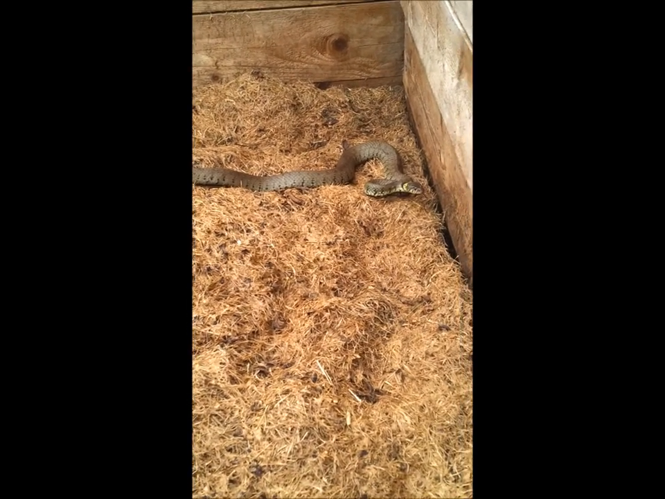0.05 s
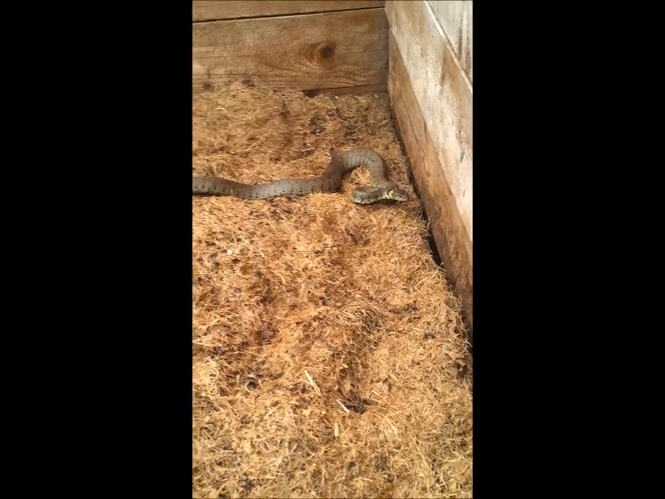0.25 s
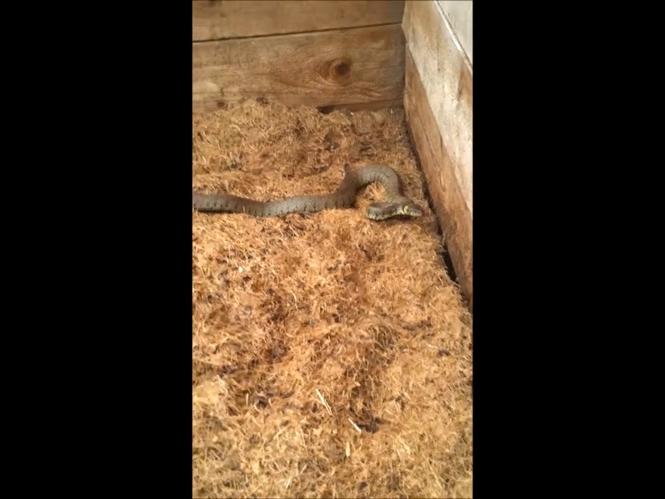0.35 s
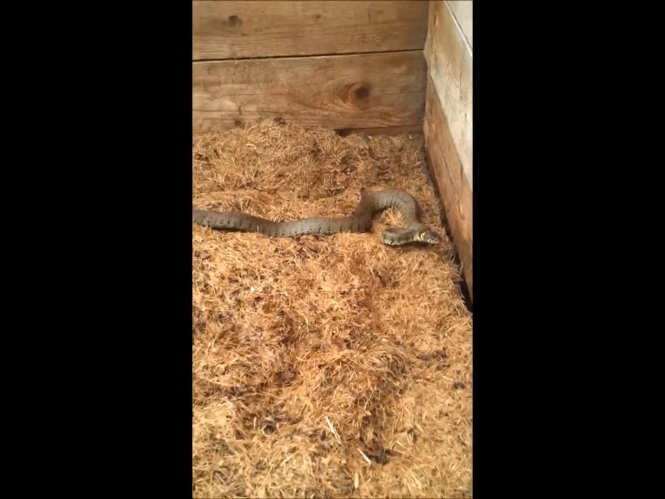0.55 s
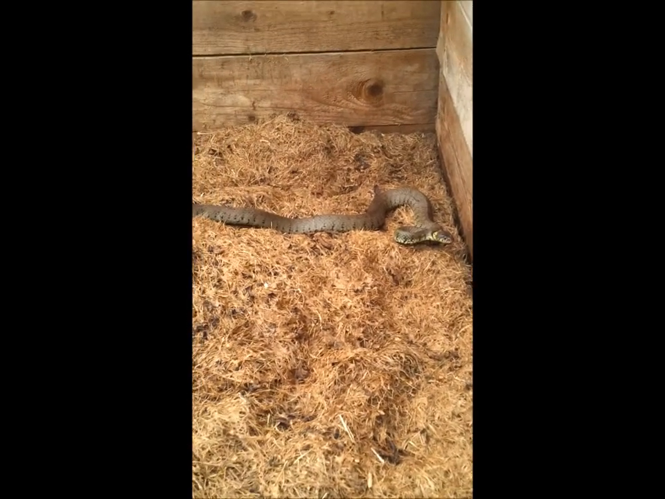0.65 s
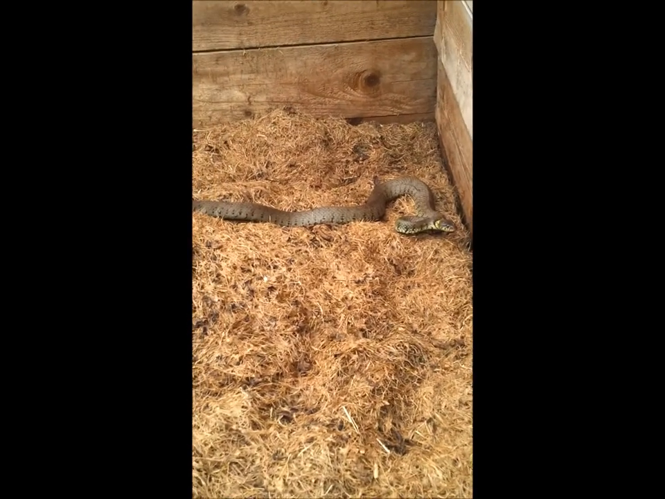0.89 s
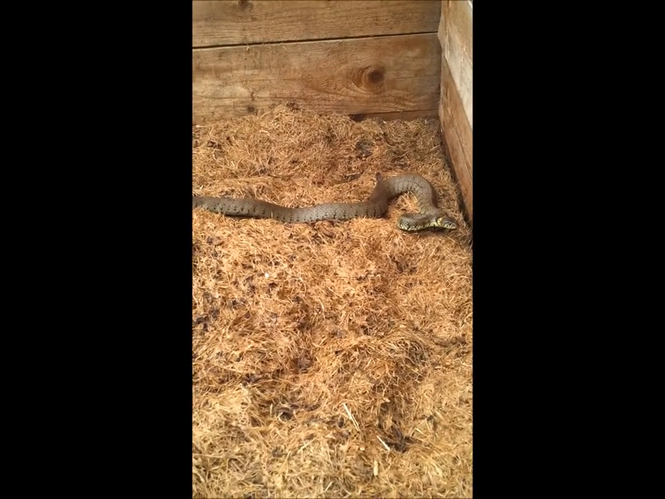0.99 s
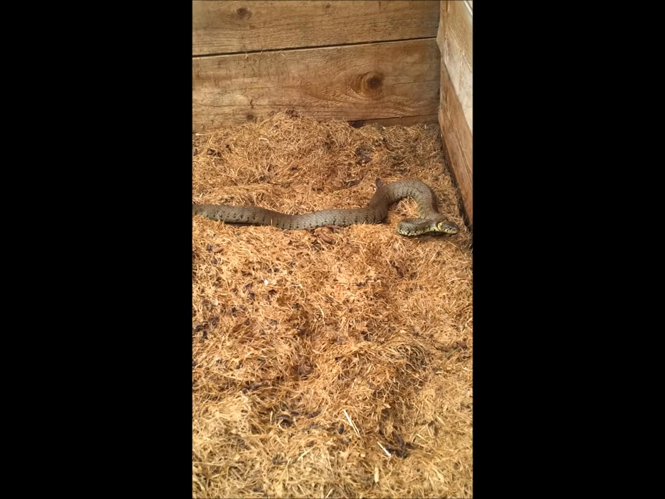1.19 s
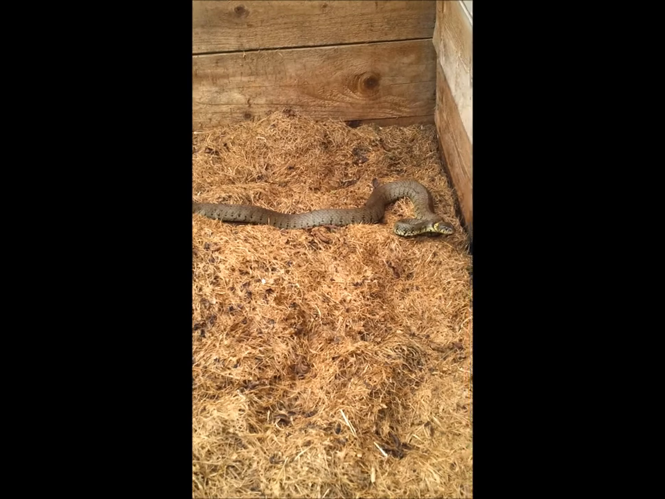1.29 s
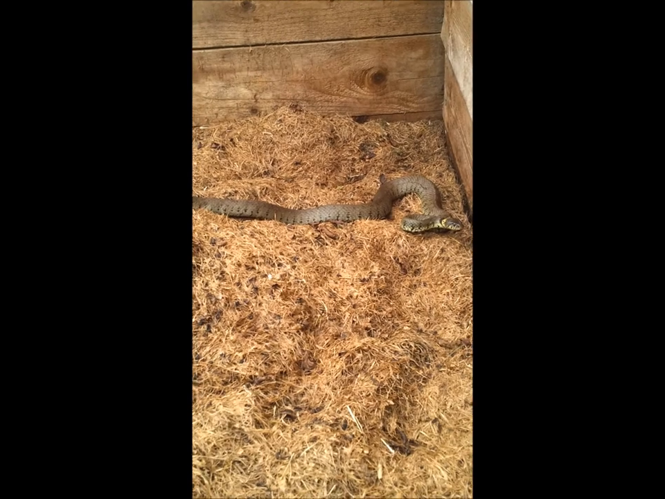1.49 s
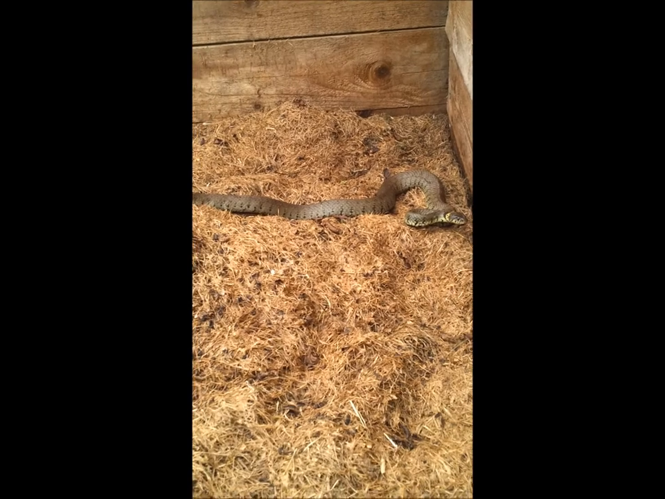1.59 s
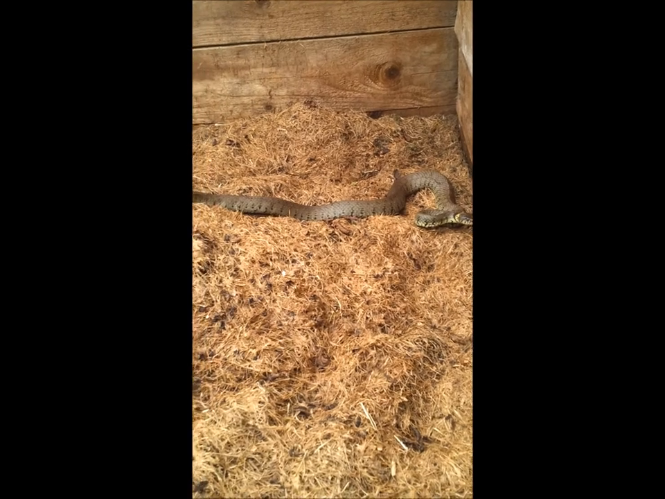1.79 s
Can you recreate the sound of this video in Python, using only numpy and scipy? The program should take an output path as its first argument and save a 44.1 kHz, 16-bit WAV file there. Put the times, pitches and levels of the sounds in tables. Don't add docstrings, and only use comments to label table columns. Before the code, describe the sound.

Brief airy snake hiss, close and dry, preceded by a sharp handling swipe with ticks and a swish; afterwards quiet bumps, a faint distant bird whistle and light rustling of bedding over a soft low background.

```python
import sys
import numpy as np
from scipy import signal
from scipy.fft import rfft, irfft
from scipy.io import wavfile
from scipy.ndimage import uniform_filter1d

SR = 44100
rng = np.random.default_rng(int(sys.argv[2]) if len(sys.argv) > 2 else 0)


def put_to_file(sound):
    columns = np.atleast_2d(sound).T
    safe = np.clip(columns, -1, 1)
    whole_steps = np.round(safe * 32767)
    wavfile.write(sys.argv[1], SR, whole_steps.astype(np.int16))


def volts_from_db(level):
    exponent = np.asarray(level, float) / 20
    return 10 ** exponent


N = 81585
TIME = np.arange(N) / SR


def evened(x):
    return x / np.sqrt(np.mean(x ** 2) + 1e-20)


def curve(rows, column=1, before=None):
    rows = np.asarray(rows, float)
    return np.interp(TIME, rows[:, 0], rows[:, column], left=before, right=before)


def colour(x, points):
    f, db = np.transpose(points)
    hz = np.fft.rfftfreq(N, 1 / SR) + 1
    octaves_outside = np.maximum(np.log2(f[0] / hz), 0) + np.maximum(np.log2(hz / f[-1]), 0)
    gain_db = np.interp(np.log(hz), np.log(f), db) - 14 * octaves_outside
    return evened(irfft(rfft(x) * volts_from_db(gain_db), N))


def band(x, low_hz, high_hz):
    return signal.sosfilt(signal.butter(3, [low_hz, high_hz], "band", fs=SR, output="sos"), x)


def resonate(x, hz, width_hz):
    turn = np.exp(2j * np.pi * np.cumsum(hz * np.ones(len(x))) / SR)
    r = np.exp(-np.pi * width_hz / SR)
    return 2 * (turn * signal.lfilter([1 - r], [1, -r], x / turn)).real


def grains(per_s, spread_db, smooth):
    size_db = spread_db * np.minimum(rng.exponential(1, N), 4)
    clicks = volts_from_db(size_db) * rng.choice([-1., 1.], N) * (rng.random(N) < per_s / SR)
    return evened(clicks) + smooth * rng.standard_normal(N)


def flutter(span_s, depth_db):
    width = max(round(span_s * SR), 2)
    wobble = uniform_filter1d(uniform_filter1d(rng.standard_normal(N), width), width)
    return volts_from_db(depth_db * evened(wobble))


# frequency in Hz, level in dB per Hz.
FLOOR_TONE = [(88, -13), (150, -3), (416, -16), (490, -25), (567, -10), (1090, -16), (2770, -20.5),
              (3510, -22), (11700, -26), (15200, -51), (22000, -120)]


def background():
    return colour(rng.standard_normal(N) * flutter(0.21, 1.0), FLOOR_TONE) * volts_from_db(-52.5)


def hum():
    return volts_from_db(-58) * evened(resonate(rng.standard_normal(N), 156.8, 2.8))


# time in seconds, gust level in dB.
GUST = [(0, -47), (.09, -40), (.16, -45.5), (.23, -42.5), (.3, -31), (.375, -44), (.42, -41), (.47, -52),
        (.5, -43.5), (.53, -46.5), (.66, -47.5), (.85, -47), (.95, -46), (.99, -43.5), (1.2, -49),
        (1.33, -41), (1.39, -50), (1.85, -47.5)]
# frequency in Hz, level in dB per Hz.
GUST_TONE = [(12, -77), (20, 0), (113, -2.5), (236, -20.5), (285, -11.5), (357, -22), (400, -22),
             (520, -18), (880, -120)]


def air():
    eddies = rng.standard_normal(N) * flutter(0.0087, 1.6)
    return colour(eddies, GUST_TONE) * volts_from_db(curve(GUST) - 1.0)


# start in
# seconds, peak level in dB, lowest frequency in Hz, highest frequency in Hz, 60 dB decay time in seconds.
TICKS = [(0.088, -32.5, 360, 2540, 0.042), (0.1481, -30, 370, 2820, 0.041), (0.176, -43, 915, 1490, 0.04),
         (0.183, -39.5, 585, 1260, 0.034), (.198, -36.5, 910, 2490, 0.073), (0.225, -41, 890, 2500, 0.078),
         (0.2436, -33.5, 1570, 6400, 0.017), (0.255, -31, 1000, 3300, 0.013), (.267, -33, 700, 2500, .008),
         (0.281, -28, 800, 2480, 0.016), (.298, -29, 500, 2490, .012), (.311, -26, 596, 2160, 0.0088),
         (0.3145, -21.5, 705, 2490, 0.012), (.329, -23, 500, 2520, 0.0071), (.337, -23, 800, 3180, 0.013),
         (0.3693, -10, 1080, 3440, 0.0046), (.3815, -19, 1490, 2300, 0.025),
         (.396, -18.5, 3300, 4600, 0.0068), (.436, -31, 404, 1070, 0.083), (0.57, -36, 810, 1890, 0.02),
         (0.667, -36, 483, 1930, 0.029), (.846, -39, 286, 810, 0.019), (1.1614, -40, 251, 1460, 0.006),
         (1.773, -40, 497, 990, 0.018), (1.791, -36, 650, 1481, 0.016), (1.824, -38, 497, 1200, 0.018),
         (1.843, -41, 795, 1530, 0.036)]


def ticks():
    out, t = np.zeros(N + 4000), np.arange(4000) / SR
    for s, db, low_hz, high_hz, t60 in TICKS:
        crackle = rng.standard_normal(4000) * volts_from_db(-60 * t / max(t60, .004))
        push = (t == 0) * 13.0 + crackle
        push = signal.lfilter([1], [1, -.85], push)
        low_pass = signal.butter(6, high_hz, fs=SR, output="sos")
        tick = signal.sosfilt(low_pass, band(push, low_hz, high_hz))
        out[round(s * SR):][:4000] += volts_from_db(db) * tick / abs(tick).max()
    return out[:N]


# start in seconds, level in dB, pitch in Hz, 60 dB decay time in seconds.
THUMPS = [(0.111, -41.5, 64.3, 0.27), (0.196, -36, 244, 0.027), (0.243, -27.5, 183, 0.039),
          (0.255, -31, 161, 0.05), (0.2762, -18.5, 340, 0.0053), (.2885, -28, 407, 0.015),
          (.3132, -23.5, 580, 0.012), (0.3167, -24, 590, 0.019), (0.329, -33, 294, 0.033),
          (0.354, -25.5, 424, 0.018), (0.3578, -29, 300, 0.032), (0.367, -19.5, 107, 0.018),
          (0.3704, -25.5, 280, 0.016), (.384, -36, 284, 0.025), (0.404, -26.5, 111, 0.032),
          (0.4362, -30, 306, 0.012), (0.876, -35.5, 69, 0.074), (0.973, -47, 153, 0.086),
          (.985, -39, 130, 0.021), (1.002, -36, 131, 0.044), (1.045, -42, 91, 0.037),
          (1.1146, -36.5, 146, 0.028), (1.131, -38, 99, 0.036), (1.1615, -41.5, 520, 0.0056),
          (1.172, -42, 121, 0.073), (1.187, -38.5, 69.4, 0.12), (1.217, -34, 85.6, 0.04),
          (1.23, -39.5, 111, 0.064), (1.252, -37, 119, .03), (1.263, -42, 90, 0.033),
          (1.273, -32.5, 111, 0.024), (1.295, -50, 99, 0.023), (1.312, -33, 118, 0.029),
          (1.322, -34.5, 71.5, 0.067), (1.804, -45.5, 69, 0.097)]


def thumps():
    out, t = np.zeros(N + 4000), np.arange(4000) / SR
    for s, db, hz, t60 in THUMPS:
        rise = np.minimum(t * hz / 0.33, 1)
        decay = volts_from_db(db + 8 - 60 * t / t60)
        out[round(s * SR):][:4000] += np.sin(2 * np.pi * hz * t) * rise * decay
    return out[:N]


# time in seconds, drag force in dB.
DRAG = [
    (.17, -68),
    (.235, -44.5),
    (.272, -40.5),
    (.285, -38.5),
    (.325, -34),
    (.345, -38),
    (.372, -28.5),
    (.413, -41.5),
    (.452, -49),
    (.47, -63),
]
# frequency in Hz, level in dB per Hz.
DRAG_TONE = [(35, -24), (60, -5), (167, -8), (583, -6), (1210, -9), (1680, -8), (6000, -42), (7800, -66),
             (13200, -120)]


def drag():
    slips = grains(2500, 2.0, 1.1) * flutter(.006, 2.6)
    return volts_from_db(1.5) * colour(slips, DRAG_TONE) * volts_from_db(curve(DRAG, before=-120))


# time in seconds, level in dB, centre frequency in Hz.
SWISH = [
    (.24, -72, 2460),
    (.29, -44.5, 2700),
    (.34, -42, 2900),
    (.365, -31.5, 2570),
    (.385, -26.5, 4100),
    (.4, -33.5, 3800),
    (.415, -39, 5000),
    (.445, -47.5, 5800),
    (.475, -73, 6750),
]


def swish():
    source = grains(6000, 3.0, 1.2) * flutter(0.0017, 1.4)
    centre_hz = curve(SWISH, column=2)
    peak = resonate(resonate(source, centre_hz, 3000), centre_hz, 7900)
    return (evened(peak) + volts_from_db(-10.5) * evened(source)) * volts_from_db(curve(SWISH, before=-120))


# time in seconds, breath force
# in dB, centre frequency in Hz.
HISS = [(.44, -52, 6600), (.505, -55, 7200), (.513, -45.5, 7440), (.535, -39.5, 7500), (.585, -43, 7700),
        (.597, -49, 7340), (.622, -46, 7500), (.632, -43, 7500), (.663, -39, 7000), (.67, -48, 6800),
        (.721, -47, 7150), (.726, -66, 7000),
        (.76, -55, 7200), (.865, -52, 7040), (.878, -62, 6900), (.915, -62, 6700), (.925, -53, 6500),
         (.97, -55, 6600), (.985, -61, 6700), (1.15, -59, 6800), (1.165, -51, 6930), (1.28, -54, 7200),
         (1.38, -59, 7500), (1.5, -56, 7400), (1.54, -51, 7300), (1.7, -50.5, 7300), (1.81, -52, 7400),
         (1.85, -58, 7440)]


def hiss():
    breath = HISS
    width_hz, narrows_s = 2700, .668
    source = grains(6000, 3.2, 1.0) * flutter(0.008, 0.17)
    centre_hz = curve(breath, column=2)
    wide = resonate(resonate(source, centre_hz, width_hz), centre_hz, width_hz)
    narrow = resonate(wide, centre_hz, 2.4 * width_hz)
    tight = np.clip((TIME - narrows_s) / .005, 0, 1)
    throat = band((1 - tight) * evened(wide) + tight * evened(narrow), 3120, 9500)
    skirt = band(source[::-1], 4200, 16000)
    onset = np.clip(TIME / breath[0][0], .1, 1) ** 2
    return (evened(throat) + volts_from_db(-10.5) * evened(skirt)) * volts_from_db(curve(breath)) * onset


# time in seconds, stir level in dB.
STIR = [(.48, -49.5), (.56, -56), (.67, -52.5), (.72, -64), (1.0, -63), (1.16, -54), (1.3, -56),
        (1.46, -55.5), (1.48, -49.5), (1.51, -50), (1.535, -56), (1.58, -48.5), (1.632, -53), (1.65, -54),
        (1.69, -47), (1.705, -62), (1.73, -48.5), (1.85, -47.5)]
# frequency in Hz, level in dB per Hz.
STIR_TONE = [(300, -4), (650, 0.5), (1300, -1), (1800, -3), (2250, -12.5), (4000, -16)]


def shavings():
    dulls_s, dull_hz = 1.72, 1950
    crackle = colour(grains(1200, 1, 0.99) * flutter(0.0088, 1.5), STIR_TONE)
    muffled = band(band(crackle, 180, dull_hz), 180, dull_hz)
    deep = np.clip((TIME - dulls_s) / 0.031, 0, 1)
    fade_in = np.clip((TIME - STIR[0][0]) / 0.05, 0, 1)
    return ((1 - deep) * crackle + deep * muffled) * volts_from_db(curve(STIR) + 1.0) * fade_in


# time in seconds, pitch in Hz, level in dB.
BIRD = [
    (.775, 3170, -70),
    (.8, 3240, -61),
    (.845, 3200, -61),
    (.895, 3075, -64),
    (.96, 3120, -64),
    (1.05, 3195, -68),
    (1.13, 3200, -73),
    (1.18, 3190, -80),
    (1.2, 3175, -60),
    (1.225, 3170, -78),
]


def bird():
    hz = curve(BIRD)
    whistle = np.sqrt(2) * np.sin(2 * np.pi * np.cumsum(hz) / SR)
    return whistle * volts_from_db(curve(BIRD, column=2, before=-120)) * flutter(.005, 1.4)


def scene():
    steady = background() + hum() + air()
    swipe = ticks() + thumps() + drag() + swish()
    return (steady + swipe + hiss() + shavings() + bird())[None]


def top_cut(x):
    return signal.sosfilt(signal.butter(12, 11840, fs=SR, output="sos"), x)


def record(dry):
    edge = signal.firwin(1023, 11830, window=("kaiser", 9), fs=SR)[None]
    return top_cut(signal.oaconvolve(dry, edge, "same"))


dry = scene()
out = record(dry)
put_to_file(out)
```